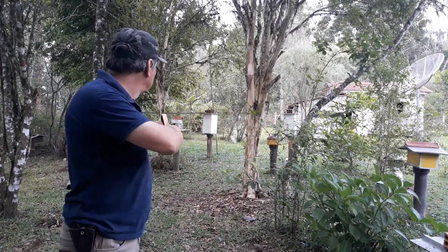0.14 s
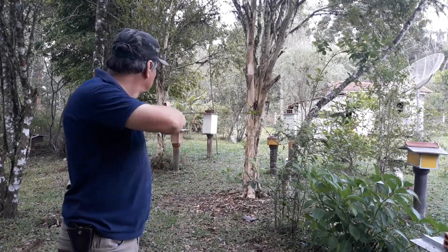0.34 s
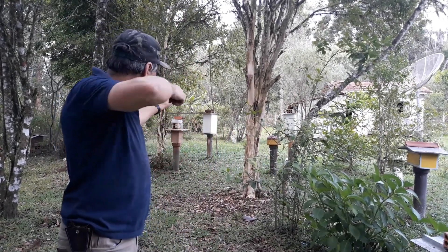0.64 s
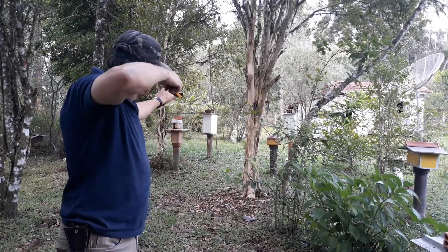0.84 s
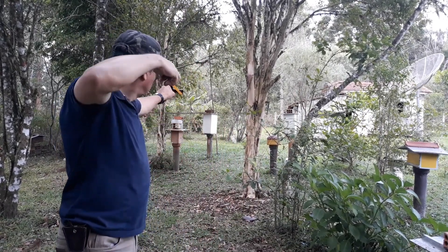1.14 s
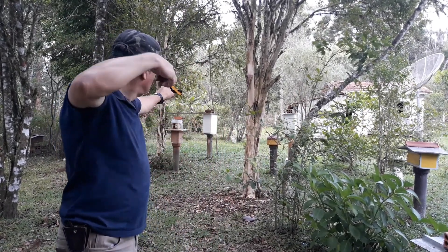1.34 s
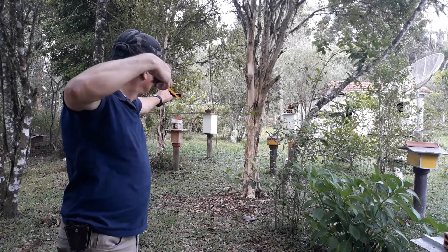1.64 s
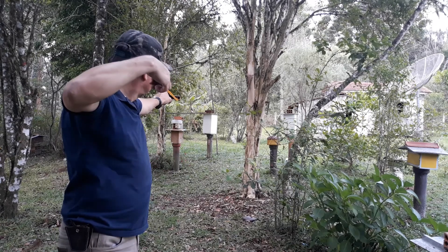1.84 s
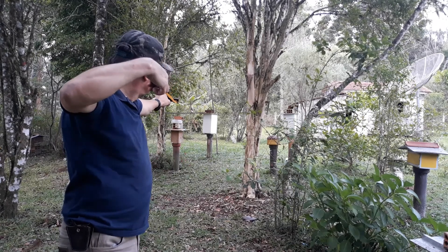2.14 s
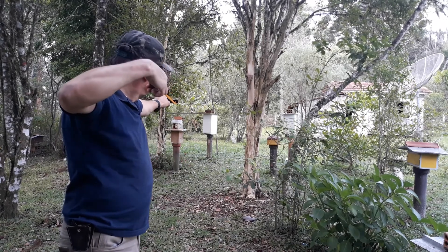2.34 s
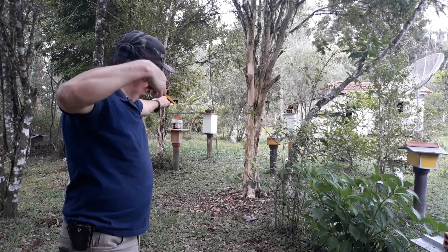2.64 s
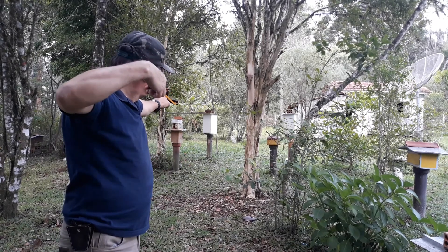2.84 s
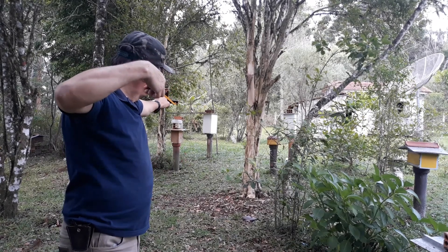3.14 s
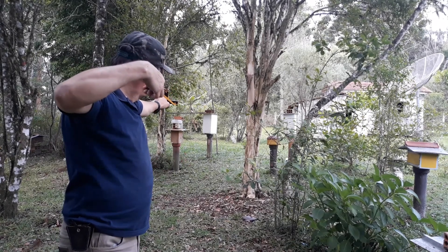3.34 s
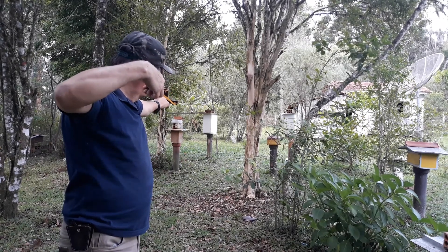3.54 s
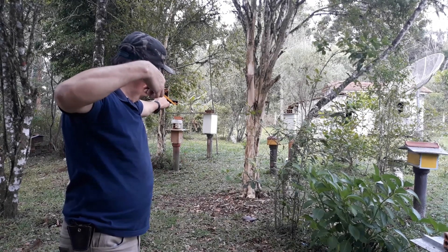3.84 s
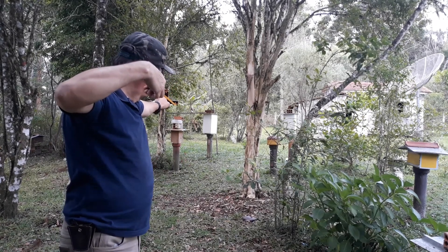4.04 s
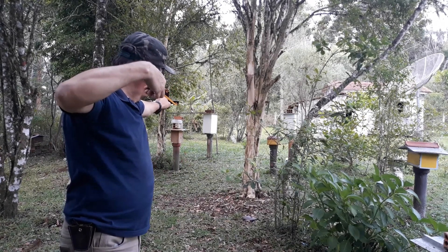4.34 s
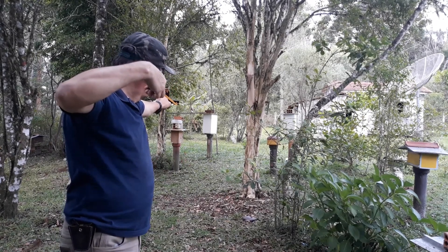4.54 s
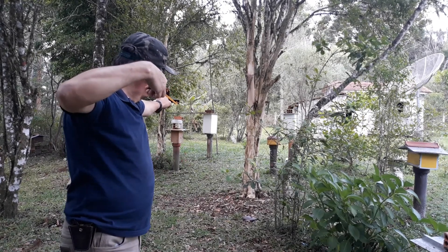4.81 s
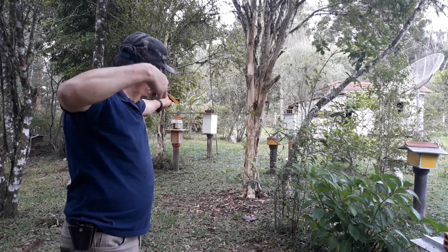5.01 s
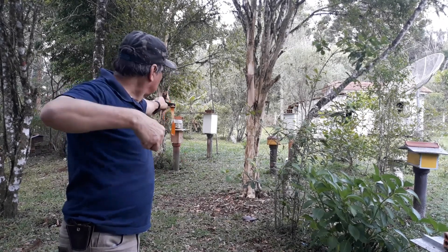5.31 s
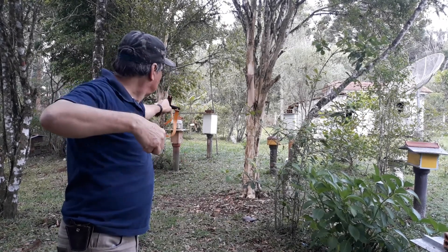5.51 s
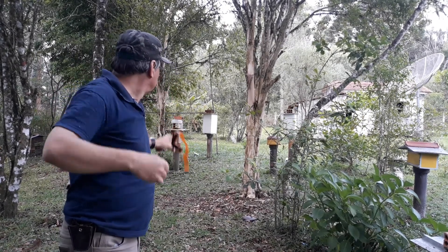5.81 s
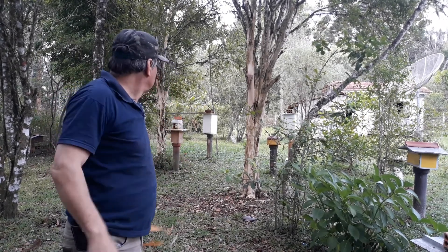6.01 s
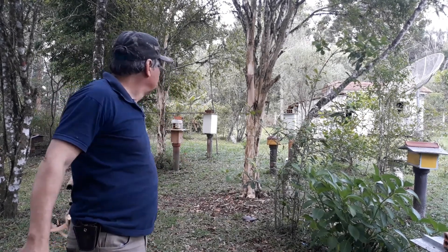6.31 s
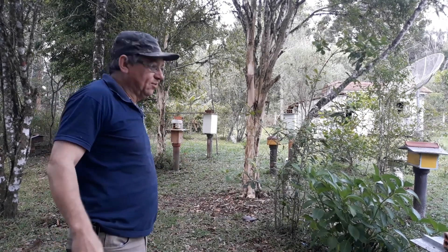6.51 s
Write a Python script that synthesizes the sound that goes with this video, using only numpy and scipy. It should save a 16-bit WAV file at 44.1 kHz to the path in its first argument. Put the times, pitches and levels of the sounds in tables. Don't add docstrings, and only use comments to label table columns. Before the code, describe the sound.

Soft leaf hiss, breeze buffeting and falling bird whistles, then a sharp close rubber snap, a metallic can hit, and a distant wooden knock.

```python
import sys
import numpy as np
from scipy import signal
from scipy.fft import rfft, irfft
from scipy.io import wavfile
from scipy.ndimage import uniform_filter1d, map_coordinates

SR = 44100
rng = np.random.default_rng(int(sys.argv[2]) if len(sys.argv) > 2 else 0)


def store_pcm(level_fs):
    pcm = np.round(np.clip(level_fs, -1, 1) * 32767).astype(np.int16)
    wavfile.write(sys.argv[1], SR, np.atleast_2d(pcm).T)


def voltage_ratio(decibels):
    exponent = np.asarray(decibels, float) / 20
    return 10 ** exponent


N = 293706


def unit(x):
    return x / np.sqrt(np.mean(x ** 2) + 1e-20)


def along(points, hz):
    point_hz, value = np.transpose(points)
    return np.interp(np.log(hz + 1), np.log(point_hz + 1), value)


def add(track, s, sound):
    part = track[round(s * SR):][:len(sound)]
    part += sound[:len(part)]


def wobble(rate):
    knots = rng.standard_normal(int(N * rate / SR) + 4)
    return map_coordinates(knots, [np.arange(N) * rate / SR])


def even(x, size):
    power = np.abs(uniform_filter1d(x ** 2, size=size))
    return unit(x / np.sqrt(power + 1e-9))


def rush(spectrum, patchy_db):
    z = signal.stft(rng.standard_normal(N + 512), nperseg=512)[2]
    field = uniform_filter1d(rng.standard_normal(z.shape), size=6, axis=0)
    field = uniform_filter1d(field, size=10, axis=1)
    x = signal.istft(z * voltage_ratio(patchy_db * unit(field)), nperseg=512)[1][:N]
    colour = voltage_ratio(along(spectrum, np.fft.rfftfreq(N, 1 / SR)))
    return unit(irfft(rfft(x) * colour, N))


def bursts(rows):
    out, t = np.zeros(N), np.arange(SR // 3) / SR
    for s, rise, t60, db in rows:
        add(out, s, (1 - np.exp(-(t / rise) ** 2)) * voltage_ratio(db - 60 * t / t60))
    return out


def struck(paths, modes, spread_db, attack):
    out, t = np.zeros(N), np.arange(SR // 25) / SR
    onset = 1 - np.exp(-(t / attack) ** 2)
    for k, (s, db) in enumerate(paths):
        tint = spread_db * (k > 0) * rng.standard_normal(len(modes))
        ring = np.zeros(len(t))
        for (hz, level, t60), shift in zip(modes, tint):
            ring += voltage_ratio(level + shift - 60 * t / t60) * np.sin(2 * np.pi * hz * t)
        add(out, s, voltage_ratio(db) * ring * onset)
    return out


# frequency in Hz, decay time t60 in seconds.
TREE_DECAY = [(300, 0.67), (1000, .7), (2500, 0.66), (5000, 0.55), (8000, 0.39), (14000, 0.38)]


def scatter(s, spectrum, level_db, stretch, build):
    hz, t, z = signal.stft(rng.standard_normal(SR), SR, nperseg=256)
    colour = along(spectrum, hz)[:, None]
    t60 = stretch * along(TREE_DECAY, hz)[:, None]
    z = z * voltage_ratio(colour - 60 * t / t60) / np.sqrt(np.mean(voltage_ratio(2 * colour)))
    tail = signal.istft(z, SR, nperseg=256)[1][:SR]
    tail = tail * (1 - np.exp(-np.arange(SR) / SR / build))
    out = np.zeros(N)
    add(out, s, voltage_ratio(level_db) * tail)
    return out


def duck():
    t = np.arange(N) / SR
    attack_s, release_at_s, release_s = .13, 6.38, .14
    sink = 1 - np.exp(-np.maximum(t - SNAP_PATHS[0][0], 0) / attack_s)
    release = np.clip((t - release_at_s) / release_s, 0, 1)
    return voltage_ratio(-7.5 * sink + 5 * release)


# time in seconds, level in dB.
DRONE_LEVEL = [(0, -53.5), (.3, -53), (1.13, -57.5), (1.8, -55), (2.25, -58), (4.68, -60.5), (5, -57)]
# frequency in Hz, density in dB per Hz.
DRONE_SPECTRUM = [(88, -26), (150, -4), (308, -2.5), (403, -0.5), (761, -5.5), (1020, -5.5), (1520, -15.5),
                  (2500, -17.5), (3250, -44), (5500, -120)]
# frequency in Hz, density in dB per Hz.
LEAF_SPECTRUM = [(760, -29), (1300, -4.5), (1540, -4.5), (1920, -0.5), (2110, -2.5), (2340, -1.5),
                 (2630, -3), (2860, -3.5), (3140, -2.5), (4780, -7), (6830, -13.5), (8890, -11.5),
                 (10400, -18.5), (15000, -22.5), (16000, -30.5)]


def leaves_and_drone():
    s, db = np.transpose(DRONE_LEVEL)
    drone_db = np.interp(np.arange(N) / SR, s, db)
    hiss_db = -73 + .2 * (drone_db - drone_db.mean())
    drone = voltage_ratio(drone_db + 1.5 + 1.3 * wobble(5)) * rush(DRONE_SPECTRUM, patchy_db=1.07)
    whole_band_db = 12
    hiss = voltage_ratio(hiss_db + whole_band_db + .3 * wobble(6)) * rush(LEAF_SPECTRUM, patchy_db=.8)
    return duck() * (drone + hiss)


# time in seconds, peak level in dB, half length in seconds.
WIND_PUFFS = [(.3, -53, .09), (0.426, -48, .08), (.63, -45.5, 0.057), (.72, -39, .07), (0.863, -49.5, 0.22),
              (1.21, -56, .2), (1.43, -50, .04), (1.5, -43, 0.15), (1.76, -56, .09), (2.202, -48, 0.056),
              (2.552, -48.5, 0.15), (2.756, -47.5, .09), (2.853, -50, 0.046), (3.002, -52, .07),
              (3.113, -47, 0.033), (3.388, -41, 0.039), (3.45, -49, .06), (3.502, -44.5, .07),
              (3.634, -45, .09), (3.79, -48, .06), (3.917, -52.5, .05), (4.545, -51, 0.046),
              (4.825, -46.5, .055), (5.07, -34, 0.026), (5.21, -52, 0.064), (5.36, -47, 0.092),
              (5.542, -49, .11), (5.72, -52, 0.073), (6.192, -58.5, .08), (6.34, -55, .1)]


def buffeting():
    t = np.arange(0, N, 64) / SR
    s, db, half = np.transpose(WIND_PUFFS)[..., None]
    lull = np.clip(np.minimum(t - 5.8, 6.14 - t) / 0.032, 0, 1)
    breeze_db = -60.5 - 8 * lull
    puff_db = np.max(db - 11 * np.abs(t - s) / half, axis=0)
    return np.interp(np.arange(N) / SR, t, np.maximum(breeze_db, puff_db))


# frequency in Hz, density in dB per Hz.
WIND_SPECTRUM = [(15, -56), (25, -24), (50, -3), (97, 3.5), (188, -10.5), (270, -20), (360, -20),
                 (400, -18.5), (520, -53.5), (880, -120)]


def wind():
    lumps = voltage_ratio(3.5 * wobble(30))
    level_db = np.minimum(buffeting(), -39)
    return voltage_ratio(level_db) * even(lumps * rush(WIND_SPECTRUM, patchy_db=1.0), size=3000)


# start in seconds, length in
# seconds, start and end pitch in Hz, level in dB.
FAR_CALLS = [(.14, .14, 1030, 1010, -64), (.3, .14, 1030, 1010, -66), (.555, .05, 2350, 2280, -68),
             (.64, .05, 2300, 2280, -69), (.75, .03, 3950, 3500, -69), (.865, .025, 4780, 4700, -64),
             (.875, .03, 3950, 3100, -67), (.92, .025, 3100, 3900, -69), (.95, .025, 3500, 3100, -67),
             (1.61, .1, 3330, 3280, -70), (1.82, .09, 3280, 3300, -67), (2.04, .05, 2850, 2700, -66),
             (2.06, .11, 3370, 3350, -66), (2.13, .04, 2800, 2760, -67), (2.39, .1, 4360, 4330, -61),
             (2.46, .07, 2760, 2740, -70), (2.51, .06, 3280, 3260, -70), (2.87, .04, 3400, 3750, -69),
             (2.9, .05, 3790, 3800, -63), (2.94, .07, 3800, 3950, -68), (3.05, .025, 5350, 4600, -60),
             (4.47, .06, 2320, 2300, -67), (4.58, .04, 3250, 3500, -69), (4.94, .05, 2330, 2320, -69)]


def far_birds(flutter):
    out = np.zeros(N)
    for s, length, start_hz, end_hz, db in FAR_CALLS:
        u = np.arange(0, 1, 1 / (length * SR))
        rough = voltage_ratio(db + 3 + 2 * flutter[round(s * SR):][:len(u)])
        glide = start_hz + (end_hz - start_hz) * u
        add(out, s, rough * np.sin(np.pi * u) * np.sin(2 * np.pi * np.cumsum(glide) / SR))
    return out


# start in seconds, length in seconds, start and end pitch in Hz, level in dB.
WHISTLED_NOTES = [
    (2.262, .19, 5300, 4330, -57),
    (2.58, .245, 5870, 3290, -54.5),
    (2.968, .335, 7100, 3090, -53),
    (3.478, .225, 5420, 3450, -54.5),
]


def whistles(flutter):
    song = np.zeros(N)
    throat_hz, throat_width_hz = 4330, 420
    onset_s, fade_s = .028, .065
    for s, length, start_hz, end_hz, db in WHISTLED_NOTES:
        t = np.arange(0, length, 1 / SR)
        glide = end_hz + (start_hz - end_hz) * (1 - t / length) ** 1.9
        edge = np.clip(np.minimum(t / onset_s, (length - t) / fade_s), 0, 1)
        throat = 1 / np.sqrt(1 + ((glide - throat_hz) / throat_width_hz) ** 2)
        tone = np.sin(2 * np.pi * np.cumsum(glide) / SR)
        add(song, s, np.sqrt(2) * voltage_ratio(db) * throat * edge * tone)
    voice_break = np.clip(np.abs(np.arange(N) / SR - 3.085) / .018, .25, 1)
    return song * voltage_ratio(2.5 * flutter) * voice_break


def birds():
    flutter = wobble(90)
    song = far_birds(flutter) + whistles(flutter)
    late = np.arange(SR // 2) / SR
    haze = rng.standard_normal(SR // 2) * voltage_ratio(-60 * late / 0.43) * (1 - np.exp(-late / 0.025))
    return song + voltage_ratio(-4.5) * signal.fftconvolve(song, haze / np.linalg.norm(haze))[:N]


# start in seconds, rise in seconds, decay time t60 in seconds, level in dB.
STIRRINGS = [
    (4.3, .02, .2, -72),
    (5.4, 0.036, 0.82, -55.5),
    (5.51, .003, .15, -57),
    (5.826, .002, 0.25, -48),
    (6.135, .005, .12, -64),
]
# frequency in Hz, density in dB per Hz.
RUSTLE_SPECTRUM = [(400, -24.5), (900, 3), (4000, -4.5), (9000, -11.5), (13000, -18), (16000, -22)]


def rustles():
    return bursts(STIRRINGS) * rush(RUSTLE_SPECTRUM, patchy_db=3.0)


# arrival in seconds, level in dB.
SNAP_PATHS = [(5.052, -4), (5.0542, -20), (5.0575, -15.5), (5.0695, -23), (5.0905, -36)]
# frequency in Hz, level in dB, decay time t60 in seconds.
RUBBER_MODES = [(2200, -11.5, 0.012), (3600, -4, 0.0079), (5350, -9.5, .012), (6300, -9.5, .006),
                (8000, -2, .01), (8700, -2, .012), (10300, -9.5, 0.0056), (11900, -3.5, .006),
                (13100, -4.5, 0.0048), (14700, -2.5, .006)]
# start in seconds, rise in seconds, t60 in seconds, level in dB.
BAND_FLAPS = [(5.03, .01, 1, -44), (5.046, .004, 0.24, -41.5), (5.0505, 0.0012, 0.027, -11),
              (5.056, 0.00073, 0.035, -19), (5.062, .003, 0.099, -14.5), (5.0695, .002, 0.073, -32.5),
              (5.0905, .001, .02, -25.5), (5.1487, 0.0012, 0.033, -29.5)]
# frequency in Hz, density in dB per Hz.
SNAP_SPECTRUM = [(59, -34.5), (100, -9.5), (452, -11), (547, -8.5), (608, -10.5), (801, -5.5), (1170, -13),
                 (2630, -11.5), (4670, -9.5), (5190, 0), (6290, -8), (8460, 0.5), (9820, -9.5), (14400, -7),
                 (16000, -19)]
# start in seconds, frequency in Hz, t60 in seconds, level in dB.
POUCH_SHOVES = [(5.041, 490, 0.057, -28.5), (5.045, 200, 0.057, -36), (5.051, 150, 0.021, -23.5),
                (5.0534, 450, .02, -14), (5.0545, 750, 0.0087, -5.5), (5.058, 300, 0.044, -19.5),
                (5.111, 95, 0.069, -40)]


def slingshot():
    crack = struck(SNAP_PATHS, RUBBER_MODES, spread_db=8.5, attack=0.00044)
    whip = bursts(BAND_FLAPS) * even(rush(SNAP_SPECTRUM, patchy_db=-2.4), size=200)
    shove, t = np.zeros(N), np.arange(SR // 10) / SR
    onset = 1 - np.exp(-(t / 0.00051) ** 2)
    for s, hz, t60, db in POUCH_SHOVES:
        add(shove, s, onset * voltage_ratio(db - 60 * t / t60) * np.sin(2 * np.pi * hz * t))
    tail = scatter(SNAP_PATHS[0][0], SNAP_SPECTRUM, level_db=-23.5, stretch=0.79, build=0.0055)
    return crack + whip + shove + tail


# arrival in seconds, level in dB.
CAN_ARRIVALS = [(5.2049, -1), (5.2098, -10.5), (5.2133, -7.5), (5.2155, -9.5), (5.2212, -15),
                (5.2243, -17.5), (5.2315, -26), (5.238, -29), (5.244, -21), (5.265, -21)]
# frequency in Hz, level in dB, decay time t60 in seconds.
TIN_MODES = [(957, -0.5, 0.013), (1944, -7.5, 0.013), (2900, -18, 0.0019), (3700, -12, 0.007),
             (5230, -11, 0.016), (7900, -8.5, .006), (12000, -11, 0.0045)]
# frequency in Hz, density in dB per Hz.
CAN_SPECTRUM = [(240, -50), (400, -18.5), (570, -12), (949, 1), (1090, -13), (1350, -10), (1820, -12),
                (2550, -10), (6340, -15.5), (8760, -10.5), (10400, -15), (13500, -14), (16000, -21.5)]


def can():
    blow = CAN_ARRIVALS[0][0]
    punch = np.zeros(N)
    add(punch, blow - .00022, -voltage_ratio(-0.5) * np.hanning(11))
    ring = struck(CAN_ARRIVALS, TIN_MODES, spread_db=2.5, attack=.00006)
    early = scatter(blow, CAN_SPECTRUM, level_db=-10.5, stretch=0.25, build=.005)
    late = scatter(blow, CAN_SPECTRUM, level_db=-19, stretch=0.91, build=0.014)
    small = signal.cheby2(4, 15, 660, "high", fs=SR, output="sos")
    return signal.sosfilt(small, punch + ring + early + late) + voltage_ratio(-7.0) * punch


# arrival in seconds, level in dB.
KNOCK_ARRIVALS = [(5.7213, -17), (5.7355, -26.5), (5.7415, -33.5), (5.755, -49), (5.78, -50), (5.802, -50),
                  (5.836, -38)]
# frequency in Hz, level in dB, decay time t60 in seconds.
WOOD_MODES = [(1670, -5, 0.016), (2100, 6.5, 0.011), (3050, -7, 0.012), (4810, -20, .008),
              (6300, -29, 0.0059)]
# frequency in Hz, density in dB per Hz.
KNOCK_SPECTRUM = [(290, -66), (500, -52), (777, -3.5), (1150, -24), (1580, -7.5), (2130, -1), (3050, -9.5),
                  (6420, -37), (8000, -45), (10400, -75), (17600, -120)]


def far_knock():
    ring = struck(KNOCK_ARRIVALS, WOOD_MODES, spread_db=4, attack=0.0015)
    tail = scatter(KNOCK_ARRIVALS[0][0], KNOCK_SPECTRUM, level_db=-42.0, stretch=0.97, build=0.0028)
    return ring + tail


def scene():
    garden = leaves_and_drone() + wind() + birds() + rustles()
    return (garden + slingshot() + can() + far_knock())[None]


def low_pass(x):
    return signal.sosfilt(signal.butter(12, 16990, fs=SR, output="sos"), x)


def record(dry):
    held = dry / (1 + np.abs(dry / 1.05) ** 6) ** (1 / 6)
    band_limit = signal.ellip(10, .5, 45, 15850, fs=SR, output="sos")
    mix = signal.sosfilt(band_limit, held)
    return low_pass(mix)


dry = scene()
out = record(dry)
store_pcm(out)
```